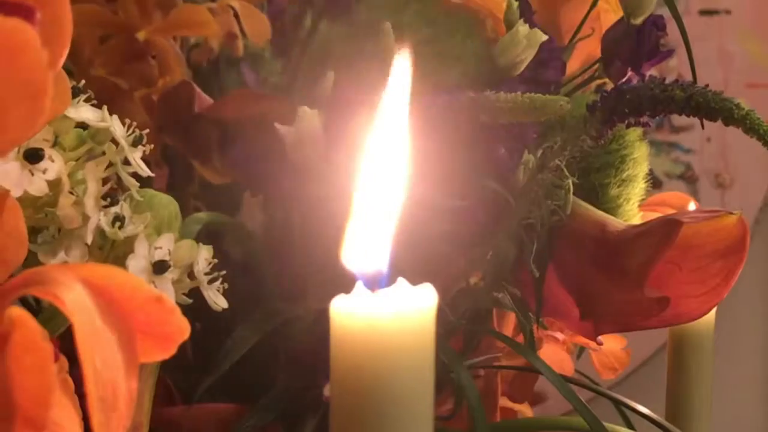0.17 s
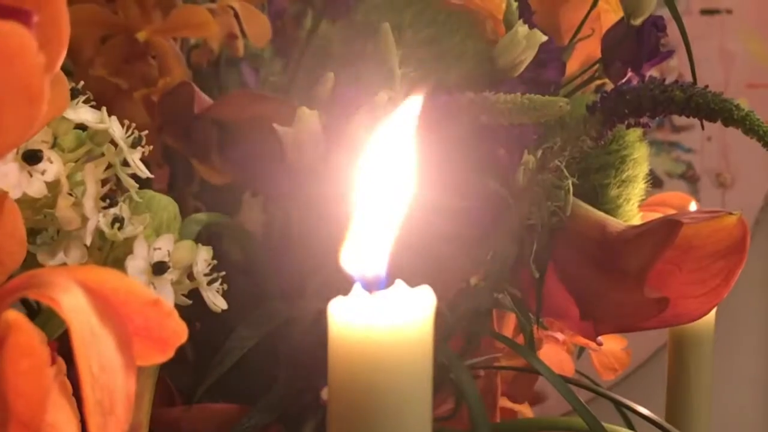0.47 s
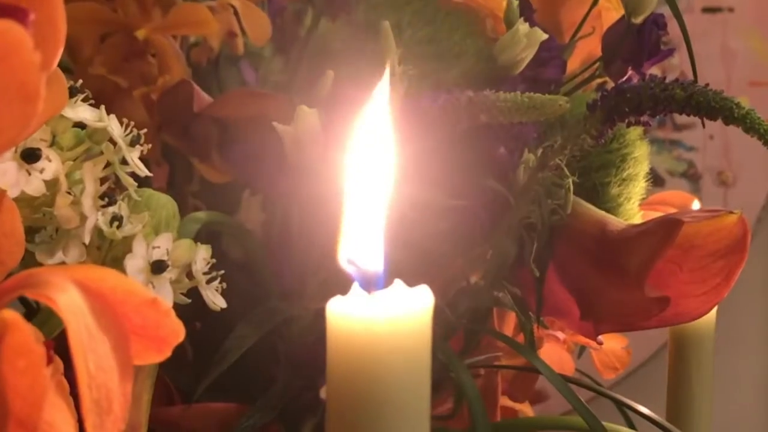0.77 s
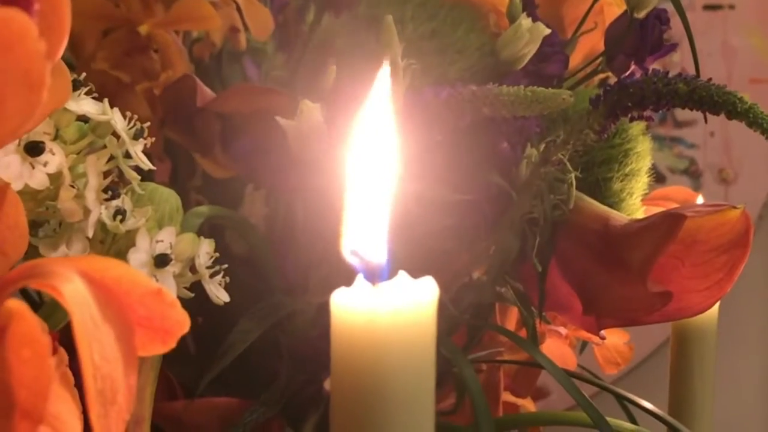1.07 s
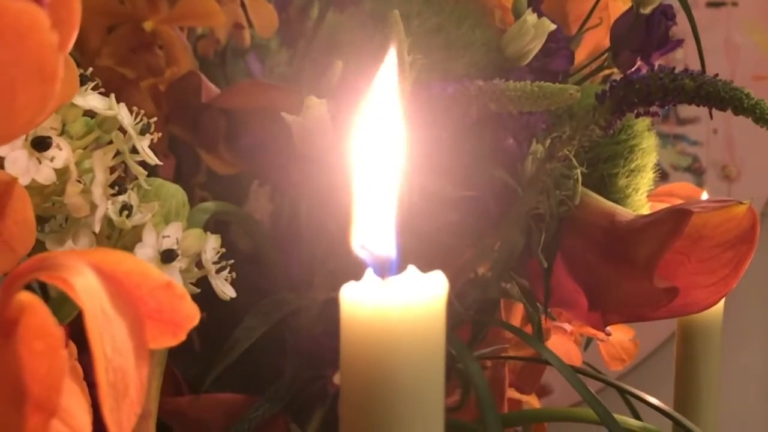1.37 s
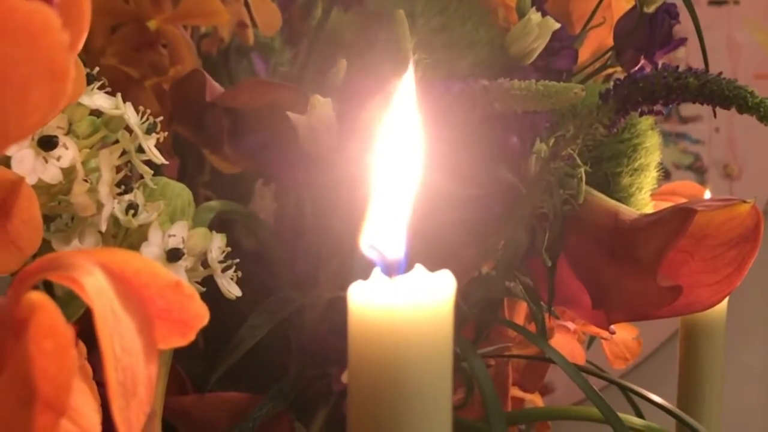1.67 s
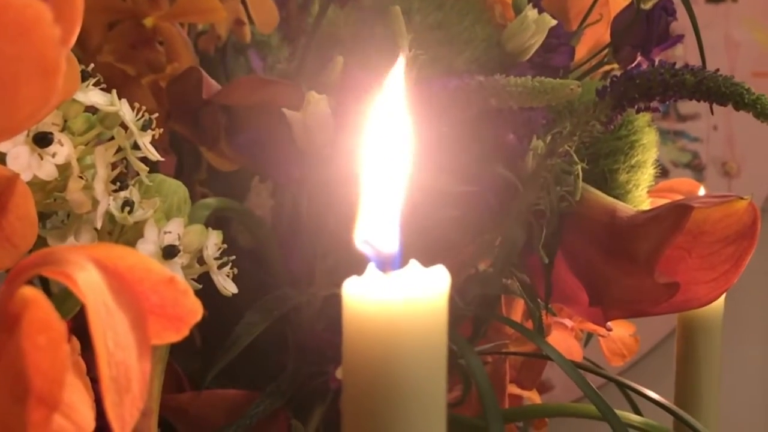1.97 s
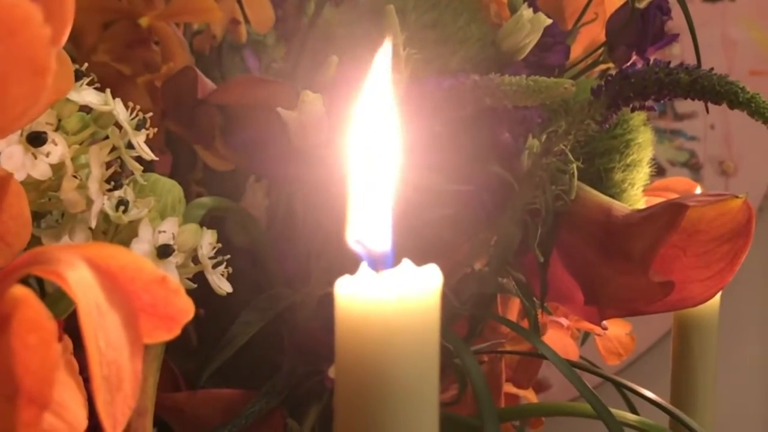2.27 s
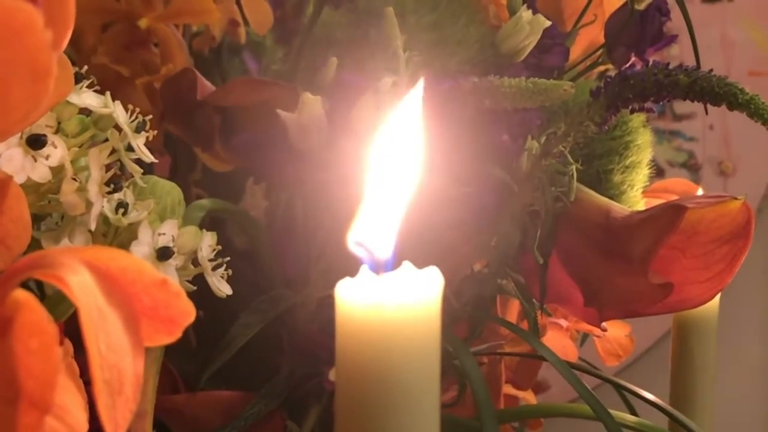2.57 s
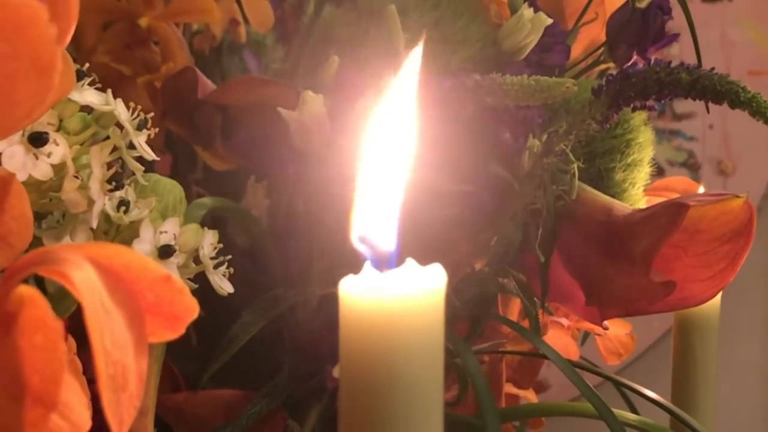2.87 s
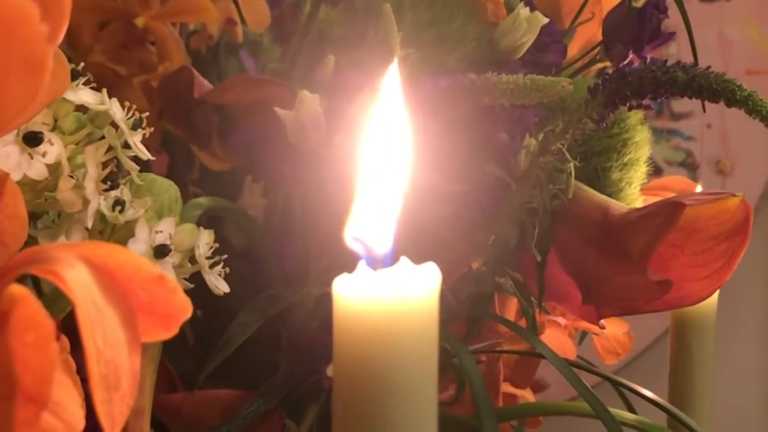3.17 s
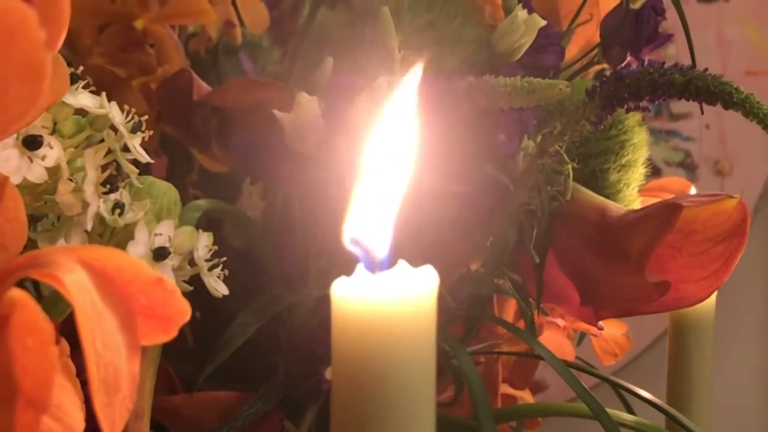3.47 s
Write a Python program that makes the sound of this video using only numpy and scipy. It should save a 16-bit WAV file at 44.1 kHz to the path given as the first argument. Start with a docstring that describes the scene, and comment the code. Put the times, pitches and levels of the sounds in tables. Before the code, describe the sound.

Candle flame crackling close up, quick dry pops and ticks over soft hiss and fluttering low hum.

```python
"""A small flame crackles indoors over fine sizzle and a low, fluttering rumble.
Pockets of vapour burst at the wick: each pop is a few milliseconds of noise, coloured in four registers.
Two deep pops add damped sines: a hollow knock and a low puff of air.
Fainter crackles and sharp ticks fill the gaps, the sizzle is flickering filtered noise,
the rumble is low noise with a wavering hum, and nearby surfaces add a very short tail."""
import sys
import numpy as np
from scipy import signal
from scipy.fft import rfft, irfft, next_fast_len
from scipy.io import wavfile
from scipy.ndimage import uniform_filter1d

SR = 44100
rng = np.random.default_rng(int(sys.argv[2]) if len(sys.argv) > 2 else 0)


def file_out(sig):
    """Save sig as 16-bit WAV at sys.argv[1]."""
    # one column per channel
    cols = np.atleast_2d(sig).T
    # limit, then scale
    lim = np.clip(cols, -1, 1)
    pcm = np.round(lim * 32767).astype(np.int16)
    wavfile.write(sys.argv[1], SR, pcm)


N = 160083
TIME = np.arange(N) / SR


def from_db(db):
    """Decibels to gain."""
    return 10 ** (np.asarray(db) / 20)


def rms_one(x):
    """Scale to unit rms."""
    return x / np.sqrt(np.mean(x ** 2) + 1e-20)


def in_time(rows):
    """Interpolate (time [s], value) rows at every sample."""
    return np.interp(TIME, *np.transpose(rows))


def colour(x, points):
    """Filter by (frequency [Hz], gain [dB]) points, interpolated over log frequency."""
    points_hz, gains_db = np.transpose(points)
    size = next_fast_len(N + 4096)
    freqs_hz = np.maximum(np.fft.rfftfreq(size, 1 / SR), 1)
    gain = from_db(np.interp(np.log(freqs_hz), np.log(points_hz), gains_db))
    return irfft(rfft(x, size) * gain, size)[:N]


def drift(cutoff_hz):
    """Low-passed noise of unit rms."""
    lowpass = signal.butter(2, cutoff_hz, fs=SR, output="sos")
    settled = signal.sosfilt(lowpass, rng.standard_normal(N + SR))[SR:]
    return rms_one(settled)


def reflections(x, t60_s):
    """Diffuse tail: convolution with noise that falls 60 dB in t60_s."""
    t = TIME[:SR // 2]
    tail = rng.standard_normal(len(t)) * from_db(-60 * t / t60_s)
    tail *= t > .002  # gap before the first reflection
    return signal.fftconvolve(x, tail / np.sqrt(np.sum(tail ** 2)))[:N]


def spits(rows, ring_db):
    """Bursts of turbulence: uneven noise with attack, hold, release and faint tail, resonant in each register."""
    # registers of a burst, body to fizz: (low edge [Hz], high edge [Hz])
    registers = [(650, 1570), (1400, 3210), (3000, 6130), (6200, 14100)]
    attack_s, lead_s, release_s = 0.000055, .0004, 0.0015
    tail_db, tail_t60_s = -12, .03
    grain_db, pitch_scatter_oct = 3.5, 0.42
    size, margin = 1024, 32  # samples

    rows = np.asarray(rows)
    start_s, length_s, register_db = rows[:, 0], rows[:, 1:2], rows[:, 2:]
    count = len(rows)

    t = np.maximum(np.arange(size) - margin, 0) / SR
    after_s = np.maximum(t - length_s, 0)
    decay = np.exp(-after_s / release_s) + from_db(tail_db - 60 * after_s / tail_t60_s)
    envelope = np.minimum(t / attack_s, 1) * decay
    # a burst is itself a cluster of uneven snaps
    unevenness = np.repeat(rng.standard_normal((count, size // 8)), 8, axis=1)
    grain = from_db(grain_db * np.clip(unevenness, -2, 2))

    hz = np.maximum(np.fft.rfftfreq(size, 1 / SR), 1)
    bursts = np.zeros((count, size))
    for k, (low_hz, high_hz) in enumerate(registers):
        noise = rng.standard_normal((count, size))
        # the first noise sample also draws the ring pitch
        pitch_hz = np.sqrt(low_hz * high_hz) * 2 ** (pitch_scatter_oct * noise[:, :1])
        ring = 1 + (from_db(ring_db) - 1) / (1 + 4j * (hz / pitch_hz - pitch_hz / hz))
        spectrum = rfft(envelope * grain * noise)
        # even out each burst's spectrum within its register
        spectrum /= np.sqrt(uniform_filter1d(np.abs(spectrum) ** 2, size=21, axis=1))
        band = signal.butter(3, [low_hz, high_hz], "band", fs=SR, output="sos")
        burst = signal.sosfilt(band, irfft(spectrum * ring))
        # level = energy over one millisecond
        burst /= np.sqrt(np.sum(burst ** 2, axis=1, keepdims=True) * 1000 / SR)
        bursts += burst * from_db(register_db[:, k])[:, None]

    out = np.zeros(N + size)
    for s, burst in zip(start_s, bursts):
        i = int(np.clip((s - lead_s) * SR - margin, 0, N))
        out[i:i + size] += burst
    return out[:N]


def rumble():
    """Broad low noise plus a bass hum: a carrier with drifting quadrature amplitudes."""
    # spectrum: (frequency [Hz], density [dB per Hz])
    spectrum = [(15, -8), (28, -25), (40, -11), (62, -4), (96, 0.5), (160, -6.5), (320, -14.5), (450, -20),
                (650, -28), (3000, -45.5)]
    # hum swell, used relative to its mean: (time [s], level [dB])
    bass_swell = [(.08, -53.5), (.22, -42.5), (.4, -51.5), (.57, -45), (.92, -61), (1.1, -52), (1.27, -57),
                  (1.6, -47.5), (1.82, -56), (2.03, -47), (2.46, -65), (2.82, -45), (3.05, -77), (3.6, -54)]
    broad_db, hum_db = -51.2, -58.5
    hum_hz, hum_width_hz = 95.6, 22.2

    broad = from_db(broad_db) * rms_one(colour(rng.standard_normal(N), spectrum))
    phase = 2 * np.pi * hum_hz * TIME
    in_phase = drift(hum_width_hz / 2) * np.cos(phase)
    quadrature = drift(hum_width_hz / 2) * np.sin(phase)
    swell_db = in_time(bass_swell)
    hum_gain = from_db(hum_db + swell_db - swell_db.mean())
    return broad + hum_gain * rms_one(in_phase + quadrature)


def sizzle(vigour_db):
    """Countless tiny bursts merged into hiss: noise with a rapidly flickering level."""
    # spectrum: (frequency [Hz], density [dB per Hz])
    spectrum = [(300, -24), (550, -9), (1000, -6.5), (1500, -7), (2800, -6.5), (4200, -5.5), (6500, -11),
                (8300, -13.5), (11000, -19), (14000, -24)]
    offset_db, flicker_db = -4, 6
    hiss = rng.standard_normal(N) * from_db(flicker_db * drift(cutoff_hz=74))
    return from_db(offset_db + vigour_db) * rms_one(colour(hiss, spectrum))


def ticks(swing_db):
    """Sharp, bright ticks: exponentially decaying noise, many tiny at random moments and a few clear."""
    # spectrum: (frequency [Hz], gain [dB])
    tick_colour = [(500, -22), (2000, -3), (4000, 0.5), (8500, -1), (14000, -3)]
    # clearest ticks, before colouring: (time [s], level [dB])
    clear_ticks = [(1.4728, -32), (3.0709, -31.5), (3.401, -21)]
    ticks_per_s, floor_db, spread_db, release_s = 100, -55, 4.5, 0.0004

    born = rng.random(N) < ticks_per_s / SR
    excess_db = spread_db * np.minimum(rng.exponential(1, N), 3)
    sizes = born * from_db(floor_db + excess_db + .5 * swing_db)
    for s, db in clear_ticks:
        sizes[int(s * SR)] = from_db(db)
    envelope = signal.lfilter([1], [1, -np.exp(-1 / (release_s * SR))], sizes + 1e-18)
    return colour(envelope * rng.standard_normal(N), tick_colour)


def crackles(swing_db):
    """Small ringing bursts at random moments, stronger as the sizzle rises; a few stand out."""
    # typical level by register, body to fizz: (level [dB])
    typical_db = np.array([-72, -63.5, -61, -63])
    # crackles that stand out: (time [s], level above typical [dB])
    clear_crackles = [(.16, 12), (.318, 17.5), (0.392, 18), (.566, 14), (0.594, 9), (.618, 11), (0.848, 14),
                      (.857, 9), (1.036, 13), (2.057, 15), (2.178, 12), (2.3734, 8), (2.841, 17.5),
                      (2.854, 11.5), (3.302, 17)]
    crackles_per_s, typical_s = 190, 0.00085
    level_spread_db, colour_spread_db = 1, 7.5

    count = int(crackles_per_s * N / SR)
    start_s = rng.random(count) * N / SR
    chance = (rng.random((count, 6)) - .5) * np.sqrt(12)  # uniform, unit spread
    level_db = level_spread_db * chance[:, 0] + np.interp(start_s, TIME, swing_db)
    length_s = typical_s * np.exp(.5 * chance[:, 1])
    register_db = typical_db + level_db[:, None] + colour_spread_db * chance[:, 2:]
    faint = np.column_stack([start_s, length_s, register_db])
    clear = [(s, typical_s, *(typical_db + db)) for s, db in clear_crackles]
    return spits(np.vstack([clear, faint]), ring_db=11)


def puffs():
    """Damped sines in two deep pops: a hollow knock and a low puff of air."""
    # amplitudes before decay: (time [s], puff level [dB], knock level [dB], knock pitch [Hz])
    rows = [(0.8214, -32.5, -25, 890), (0.982, -33, -29.5, 1060)]
    puff_hz, puff_decay_s, knock_decay_s = 191, 0.0045, 0.0011
    out = np.zeros(N)
    for s, puff_db, knock_db, knock_hz in rows:
        t = np.clip(TIME - s, 0, 100 * puff_decay_s)
        puff = np.sin(2 * np.pi * puff_hz * t) * np.exp(-t / puff_decay_s)
        knock = np.sin(2 * np.pi * knock_hz * t) * np.exp(-t / knock_decay_s)
        out += from_db(knock_db) * knock - from_db(puff_db) * puff
    return out


def pops():
    """The clear pops: vapour bursts as slightly ringing spits of turbulence."""
    # levels before the gain below and the wick colour:
    # (time [s], length [s], body [dB], crack [dB], snap [dB], fizz [dB])
    rows = [(0.1196, 0.00052, -45.5, -46, -55, -41.5), (0.1463, 0.001, -53, -39.5, -47, -44),
            (0.1749, 0.0019, -62, -44, -48, -42), (0.197, 0.00073, -48.5, -39, -35.5, -35),
            (0.2027, 0.00065, -52, -57, -37, -38), (0.233, 0.0016, -48, -47, -41, -41),
            (0.2576, 0.0012, -57, -44.5, -38.5, -31.5), (0.3365, 0.0031, -40, -38, -38.5, -40),
            (0.4318, 0.0042, -69, -66, -42.5, -39.5), (0.4712, 0.0018, -49, -51, -42.5, -62),
            (0.5041, 0.0053, -43, -41.5, -43.5, -68), (0.5409, 0.0024, -57, -47, -46, -43),
            (0.642, 0.0031, -40, -39, -41, -46), (0.7147, 0.0024, -49, -42.5, -66, -60),
            (0.7752, 0.0021, -49, -40.5, -40, -40), (0.8223, 0.00098, -38.5, -29.5, -28.5, -58),
            (0.8771, 0.00036, -53, -64, -39.5, -69), (0.9097, 0.0019, -51, -44, -42, -62),
            (0.9476, 0.0066, -50, -43.5, -33.5, -44), (0.9839, 0.0007, -40, -29, -34.5, -46),
            (0.9954, 0.00093, -45, -33, -30.5, -36.5), (1.0566, 0.0016, -55, -43.5, -38, -53),
            (1.0859, 0.001, -48, -40, -36, -51), (1.0938, 0.00027, -59, -52, -38.5, -54),
            (1.1371, 0.0022, -52, -60, -41.5, -40.5), (1.1788, 0.0014, -59, -42.5, -35.5, -36.5),
            (1.2191, 0.0013, -44, -40, -33.5, -39), (1.2261, 0.0019, -51, -45, -41, -42),
            (1.3028, 0.0013, -74, -51, -46, -34), (1.3144, 0.00052, -66, -49, -33.5, -44),
            (1.3705, 0.0013, -51, -46, -46, -59), (1.3872, 0.0015, -70, -45, -42, -47),
            (1.4015, 0.0022, -68, -47, -38.5, -44.5), (1.4383, 0.0013, -66, -43.5, -41.5, -46),
            (1.4871, 0.0071, -41, -44, -46, -49), (1.538, 0.0011, -69, -38, -40.5, -45),
            (1.5632, 0.0017, -58, -59, -37, -43), (1.5741, 0.0028, -48, -40, -40.5, -45),
            (1.5866, 0.0033, -50.5, -43, -35, -38.5), (1.6306, 0.0016, -69, -47, -41, -42),
            (1.64, 0.0046, -46, -38, -36.5, -35.5), (1.7016, 0.0024, -73, -56, -54, -34.5),
            (1.7115, 0.00044, -61, -50, -34.5, -58), (1.7365, 0.00061, -51, -41, -38, -39),
            (1.7451, 0.00056, -42, -36.5, -52, -63), (1.7637, 0.0022, -42, -36.5, -33, -41.5),
            (1.7809, 0.00075, -39, -34.5, -40, -41.5), (1.8639, 0.00029, -41, -31.5, -52, -54),
            (1.8985, 0.00093, -53, -45, -37.5, -39), (1.9222, 0.00092, -50, -38.5, -45, -41),
            (1.9363, 0.00057, -51, -38.5, -27.5, -38.5), (1.9862, 0.0037, -47, -47, -43, -40.5),
            (2.0685, 0.0016, -49, -35.5, -33, -33.5), (2.0888, 0.0042, -47, -37.5, -34, -37),
            (2.2413, 0.0045, -47, -36, -42.5, -48), (2.312, 0.00099, -45.5, -56, -39, -38),
            (2.3417, 0.0015, -46, -45.5, -57, -46), (2.3832, 0.0022, -40, -43, -39, -39),
            (2.3909, 0.00074, -38.5, -29, -27.5, -33), (2.4041, 0.0004, -67, -60, -44, -59),
            (2.517, 0.001, -41.5, -36.5, -30.5, -27), (2.5404, 0.00075, -58, -41.5, -39.5, -57),
            (2.6144, 0.0028, -39.5, -51, -30, -29), (2.6654, 0.0013, -58, -58, -47, -50),
            (2.6734, 0.00085, -35, -36.5, -32.5, -39), (2.7038, 0.0014, -64, -42.5, -46.5, -47),
            (2.7641, 0.0022, -48.5, -46, -45.5, -42), (2.9194, 0.00081, -46.5, -38, -43, -41.5),
            (3.0497, 0.0045, -48.5, -47, -39.5, -39.5), (3.1123, 0.0048, -48, -44, -42, -41.5),
            (3.1247, 0.0031, -46, -39, -56, -52), (3.1364, 0.0014, -58, -49, -39.5, -44),
            (3.178, 0.0019, -64, -44, -36, -47), (3.2047, 0.0086, -60, -39, -41, -43),
            (3.2398, 0.00078, -67, -49, -43, -40.5), (3.2473, 0.0028, -40.5, -38, -39, -59),
            (3.3298, 0.0023, -68, -44, -39, -41), (3.4052, 0.00081, -55, -43, -35, -39),
            (3.485, 0.00055, -69, -43.5, -39, -37), (3.5145, 0.0021, -57, -40, -36.5, -44),
            (3.5395, 0.0014, -60, -43, -42, -51), (3.5519, 0.0029, -43, -45, -38.5, -34.5),
            (3.5716, 0.0013, -57, -40, -41, -61), (3.5976, 0.0029, -51, -35, -30.5, -59),
            (3.6193, 0.0032, -56, -41, -38.5, -65)]
    gain_db = 0.5
    return from_db(gain_db) * spits(rows, ring_db=4.0)


def scene():
    """Pops, crackles, puffs and ticks with their reflections, over sizzle and rumble."""
    # vigour of the sizzle: (time [s], level [dB])
    vigour = [(.08, -53.5), (.18, -53.5), (.38, -57.5), (.6, -49.5), (.74, -54), (1.05, -51), (1.5, -54),
              (1.76, -54.5), (1.84, -58), (2.08, -53), (2.46, -55), (3.25, -55.5), (3.6, -52)]
    # colour of pops and crackles: (frequency [Hz], gain [dB])
    pop_colour = [(300, 22), (700, -6.5), (1000, 2.5), (1500, -1.5), (2100, 0), (3500, 1.5), (6000, -2),
                  (7200, 1.5), (8300, 1.5), (10500, -3.5), (14000, -9)]
    room_db, room_t60_s = -22, .12

    vigour_db = in_time(vigour)
    swing_db = vigour_db - vigour_db.mean()
    bursts = colour(pops() + crackles(swing_db), pop_colour)
    wick = bursts + puffs() + ticks(swing_db)
    room = from_db(room_db) * reflections(wick, room_t60_s)
    return (wick + room + sizzle(vigour_db) + rumble())[None]


def record(dry):
    """Ramp up after a moment of silence, then a steep low-pass cuts the top."""
    start_s, ramp_s, cutoff_hz = 0.071, 0.0042, 14250
    opening = np.clip((TIME - start_s) / ramp_s, 0, 1)
    lowpass = signal.ellip(10, .3, 70, cutoff_hz, fs=SR, output="sos")
    return signal.sosfilt(lowpass, dry * opening)


dry = scene()
out = record(dry)
file_out(out)
```